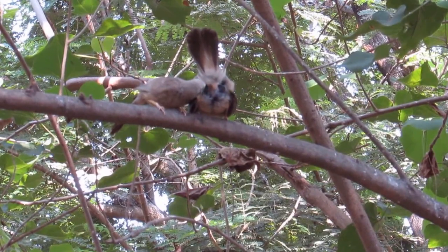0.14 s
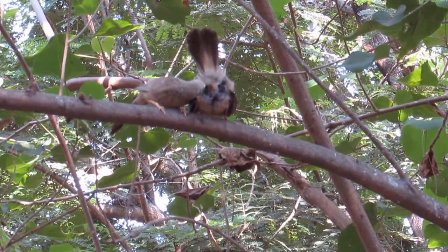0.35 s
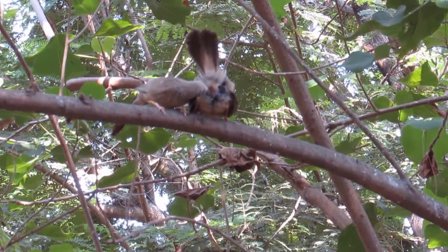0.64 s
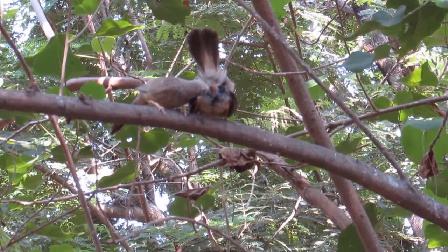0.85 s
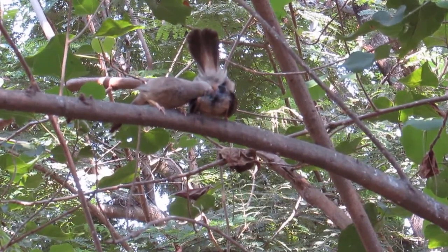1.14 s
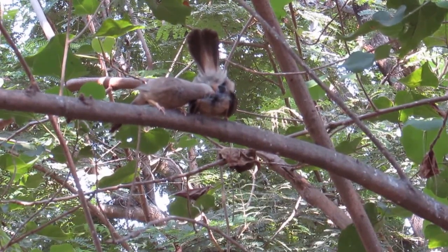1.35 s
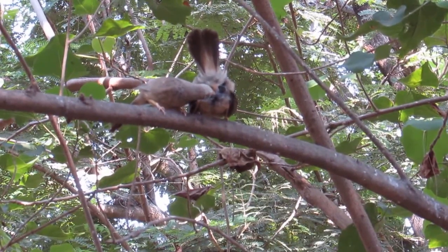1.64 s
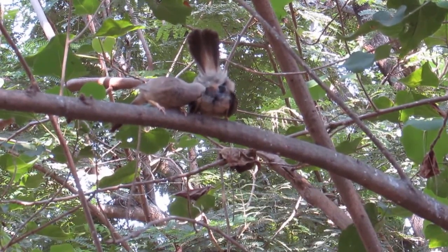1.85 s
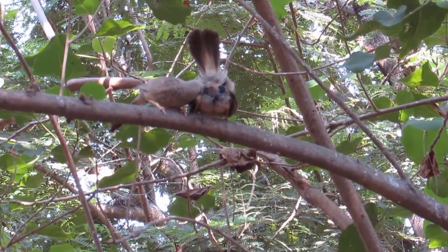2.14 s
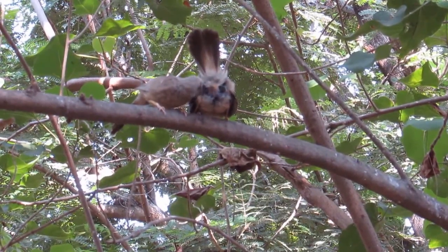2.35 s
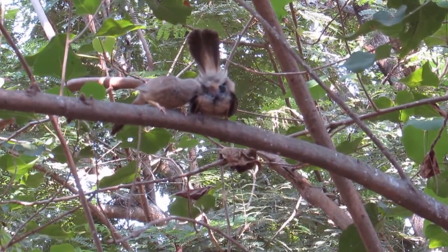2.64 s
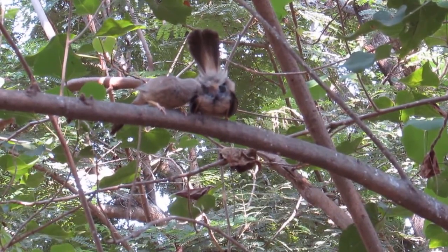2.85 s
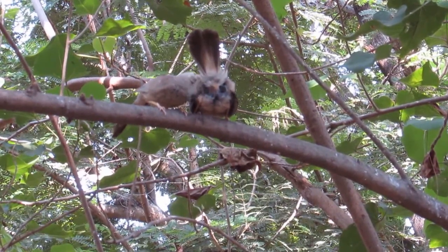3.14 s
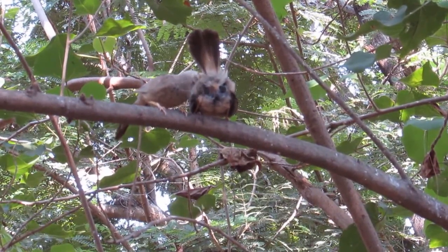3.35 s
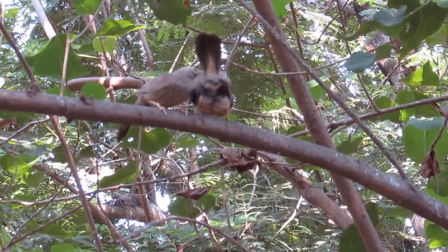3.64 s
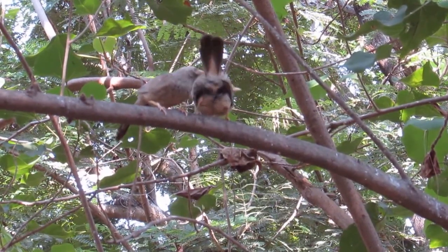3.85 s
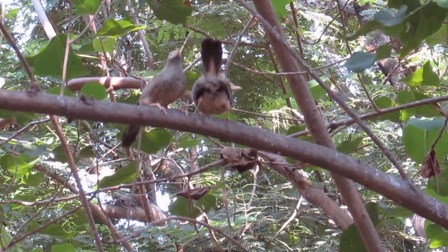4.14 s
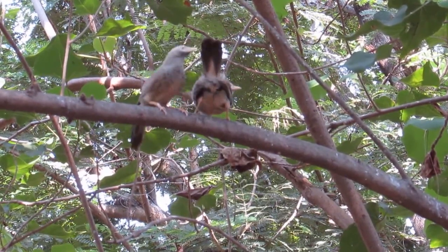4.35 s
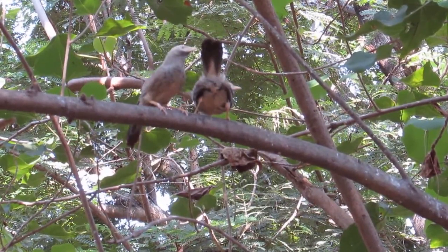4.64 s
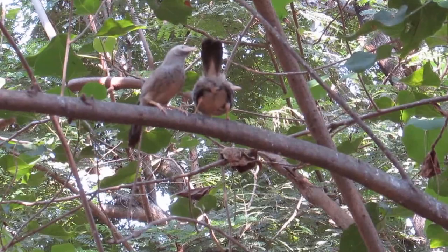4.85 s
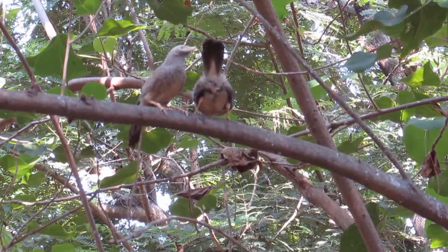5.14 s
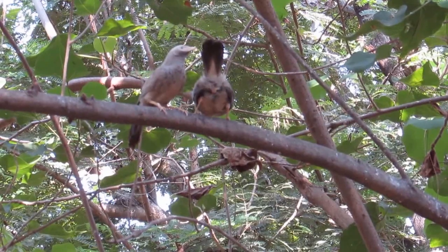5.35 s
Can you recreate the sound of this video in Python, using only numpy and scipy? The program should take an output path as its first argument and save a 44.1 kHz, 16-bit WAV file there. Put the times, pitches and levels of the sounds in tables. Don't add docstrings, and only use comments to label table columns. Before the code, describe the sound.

Outdoors among trees, picked up by a small stereo camera microphone. A bright, steady spray-like hiss lies to one side over soft town rumble, a low vehicle drone and a faint machine hum. Quick far pips around 3 kHz cluster in the first half second, then thin sliding whistles up to 5 kHz. Hoarse, nasal crow caws come at about 1.3, 1.9 and 2.5 s. The hiss dies quickly at 2.4 s, leaving a quieter background, while a soft wavering trill runs from 2.5 to 3 s. Small puffs of hiss follow; at 3.5 s a near bird gives a quick rising flick with a dull rustle. At 4.0 s one sharp, loud close squeak rings off the trunks, with a wing rustle. The distant drone swells near 4.1 s under a long caw to 4.7 s, with twitter and smaller squeaks. A faint caw, a thin nasal squeal, pips and another crow's caw close it at 5.5 s.

```python
import sys
import numpy as np
from scipy import signal
from scipy.fft import rfft, irfft
from scipy.io import wavfile
from scipy.ndimage import uniform_filter1d

SR = 44100
rng = np.random.default_rng(int(sys.argv[2]) if len(sys.argv) > 2 else 0)


def unload_audio(sound):
    columns = np.transpose(np.atleast_2d(sound))
    steps = np.round(np.clip(columns, -1, 1) * 32767)
    wavfile.write(sys.argv[1], SR, steps.astype(np.int16))


def voltage_ratio(level):
    return 10 ** (np.asarray(level, float) / 20)


N = 242991
BINS_HZ = np.arange(N // 2 + 1) * SR / N + 1e-3

# [f/Hz, level/dB per Hz]
HISS_SPECTRUM = [(1180, -44), (2000, -11.5), (2280, -12), (2510, -13), (2980, -8.5), (3230, -8.5),
                 (3770, -5.5), (4010, -7.5), (5490, -2), (9920, 2.5), (10700, 0.5), (11900, -0.5),
                 (14000, -9.5), (16000, -17.5)]
# [f/Hz, phase/rad]
HISS_LEAD = [(20, 0), (4000, .1), (6200, .9), (9000, 1.6), (12000, 2.2), (15200, 3.1)]
# [f/Hz, likeness/0-1]
HISS_LIKENESS = [(2000, .96), (3100, .96), (4500, .82), (9000, .78), (15000, .72)]
# [peak t/s, level/dB, rise/dB per s, fall/dB per s, duller part/dB relative]
PUFFS = [
    (2.78, -61.5, 80, 56, -2),
    (3.27, -62, 85, 43, 0),
    (3.53, -63, 500, 240, 11.5),
    (3.93, -67.5, 61, 60, -7.5),
    (3.99, -56, 300, 300, 6.5),
    (4.08, -63, 45, 52, 2.5),
    (4.68, -66.5, 26.5, 32.5, 0.8058),
    (5.28, -63.5, 81.5, 45.5, 3.5),
]
SPRAY_DB, SPRAY_STOP_S, SPRAY_DIES_DB_PER_S, SPRAY_DULL_DB = -51, 2.4188, 72.5, 2
HISS_FLOOR_DB, HISS_FLOOR_DULL_DB = -85, 9

# [t/s, level/dB]
RUMBLE_LEVEL = [(0, -46), (2.6, -46.5), (5.51, -47)]
# [f/Hz, level/dB per Hz]
RUMBLE_SPECTRUM = [(12, -42), (20, 2), (113, -3.5), (210, -1), (293, -7.5), (377, -8.5), (624, -13.5),
                   (1190, -21.5), (1530, -22), (2460, -33.5), (4180, -36), (5230, -41), (9950, -54),
                   (14700, -46), (16000, -52)]
# [f/Hz, phase/rad]
RUMBLE_LEAD = [(300, 0), (1000, 0.64), (2000, 0), (5000, 0.8905), (15000, 0.42)]
# [f/Hz, likeness/0-1]
RUMBLE_LIKENESS = [(50, .99997), (90, .9993), (170, .99), (290, .91), (640, .7), (1400, .72), (3100, .93),
                   (4500, .9), (6500, .5), (10000, .25)]
# [f/Hz, level/dB per Hz]
DRONE_SPECTRUM = [(120, -27), (170, -1.5), (215, 0), (280, -11), (400, -17.5)]
# [t/s, level/dB]
DRONE_LEVEL = [(0, -43.5), (3.6, -61.5), (3.95, -42.5), (4.12, -36.5), (4.3, -41.5), (4.7, -40.5),
               (5.1, -45.5), (5.45, -42)]
# [f/Hz, level/dB rms]
HUM_LINES = [
    (124.5, -47.5),
    (15734, -77),
]

# [start t/s, length/s, first f/Hz, last f/Hz, top level/dB]
PIPS = [(.015, 0.048, 3040, 2815, -42), (.09, .037, 2840, 2850, -49), (.143, 0.03161, 2790, 2905, -36),
        (.178, 0.02228, 2117, 1970, -38), (.25, .032, 2950, 2750, -47), (.44, 0.028, 2300, 2244, -45),
        (.95, 0.04706, 3120, 2785, -47), (4.07, 0.044, 3900, 3800, -50), (4.305, .06, 4816, 4970, -52),
        (4.74, 0.082, 3730, 3929, -58.5), (5.135, 0.029, 3050, 2790, -45), (5.26, 0.057, 2820, 2818, -41),
        (5.362, 0.02207, 2820, 2750, -50)]
GLIDES = [(.6, .05, 3050, 2867, -48.5), (.655, 0.075, 2905, 3129, -51.5), (.745, 0.045, 3200, 2998, -50),
          (.81, .1, 3096, 2890, -54.5), (.975, .2, 5480, 4750, -49), (1.165, .12, 4780, 3800, -50),
          (1.48, .18, 4950, 4380, -52), (1.93, .27, 4150, 4080, -53), (1.98, .32, 3400, 3600, -53),
          (3.25, .045, 3150, 3210, -50), (3.292, .042, 3200, 4320, -47), (3.345, .13, 4300, 2890, -52),
          (3.33, .14, 4310, 4270, -57), (3.6, .12, 4500, 4150, -60), (3.63, .09, 3800, 3850, -56),
          (3.7, .15, 3800, 2850, -56), (3.85, .3, 3380, 3380, -55), (4.815, 0.03646, 4170, 4930, -51.5),
          (4.855, .075, 4950, 4190, -52), (4.99, 0.15, 4330, 4200, -57.5), (5.28, 0.11, 5399, 5000, -61),
          (5.14, .16, 3450, 3430, -58), (.2, .1, 2027, 2036, -51), (.48, .1, 2310, 2250, -57)]
TRILL = [(2.5, .037, 3120, 2850, -50), (2.545, .07, 2850, 3080, -51), (2.555, .08, 3330, 3380, -56),
         (2.635, .045, 3160, 2900, -50), (2.72, .05, 3080, 2900, -52), (2.735, .05, 3300, 3300, -58),
         (2.79, .045, 3050, 2900, -54), (2.8, .04, 3320, 3300, -58), (2.85, .06, 3150, 2800, -57),
         (2.93, .03, 3100, 3000, -59), (3.0, .016, 2650, 2550, -56), (3.02, .05, 3150, 3300, -62)]
TWITTER = [
    (4.13, .2, 3250, 3450, -53),
    (4.33, .2, 3400, 3400, -54),
]
FLICKS = [
    (3.512, 0.02892, 4350, 7760, -38.5),
    (3.52, .028, 4630, 6702, -48),
    (3.525, 0.02804, 3350, 5240, -45.5),
]
SQUEAKS = [
    (4.59, 0.05789, 4200, 4415, -47.5),
    (4.657, 0.024, 4343, 4177, -42),
    (4.712, .024, 4260, 4034, -43.5),
]
SQUEAL = [
    (5.07, .38, 680, 720, -55.5),
]
# [t/s, f/Hz, level/dB]
LOUD_SQUEAK = [
    [(3.957, 3900, -33), (3.968, 4250, -24), (3.974, 4400, -23), (3.983, 4500, -18), (3.99, 4545, -20),
     (3.996, 4540, -13), (4.003, 4430, -21), (4.014, 3950, -29), (4.026, 3600, -42)],
]
# [multiple, level/dB]
SQUEAK_PARTIALS = [(1, 0), (1.5, -30), (2, -9), (3, -23)]
# [multiple, level/dB]
SQUEAL_PARTIALS = [(4, 1.5), (5, -13), (6, -6), (8, -8), (9, -6), (10, 0.5), (12, -15)]
# [share of length/0-1, share of glide done/0-1, level/dB re top]
PIP_SHAPE = [(0, 0, -1.5), (.35, 0.726, -0.5), (1, 0.7902, -7)]
GLIDE_SHAPE = [(0, 0, -3), (.3, .28, 0), (.7, .68, -2), (1, 1, -7)]
SWELL_SHAPE = [(0, 0, -22), (.35, 0.14, -3), (.6, .65, 0.5), (1, 1, -12)]
FLICK_SHAPE = [(0, 0, -9.5), (.4, .5, -3), (1, 1, 0)]

# [t/s, f/Hz, level/dB]
CAWS = [
    [(1.284, 462, -43), (1.33, 533.9, -35.5), (1.44, 550, -33.5), (1.58, 498.4, -33), (1.672, 468.4, -40),
     (1.7, 472.5, -56)],
    [(1.885, 493.6, -48.5), (1.96, 542, -37), (2.0, 563.5, -34), (2.12, 541.7, -32), (2.268, 505, -34.5),
     (2.31, 499, -62)],
    [(2.485, 529.5, -46), (2.53, 557, -38.5), (2.66, 550, -34), (2.76, 534.7, -37.5), (2.88, 510, -58)],
    [(4.025, 482, -47.5), (4.12, 539.5, -40), (4.24, 545.7, -37), (4.36, 600.3, -32), (4.5, 567.6, -38),
     (4.6, 480.4, -39.5), (4.7, 466, -63)],
    [(4.925, 485.7, -52), (5.06, 517, -39.5), (5.2, 497.1, -51)],
    [(5.3, 509, -39.5), (5.32, 499, -43.5), (5.52, 464, -45)],
]
# [f/Hz, level/dB]
CROW_THROAT = [(600, -46.5), (880, -14.5), (1050, -15), (1250, -1.5), (1550, 6.5), (1750, -4.5),
               (1950, -16.5), (2700, -26.5), (3400, -27), (4300, -30), (6000, -33)]
# [f/Hz, level/dB]
SECOND_CROW_THROAT = [(600, -30), (1000, -6), (1450, 11), (1950, 18.5), (2400, 13), (2900, -32.5),
                      (6000, -49)]
# [share of the call/0-1, low-throat share/dB]
BEAK = [(0, 0.5), (.45, -5.5), (.7, -10.5), (1, -17)]
GAPE_DB = [3, 2, -3, 0.5, -9, -6]
HALF_PITCH_DB, HALF_PITCH_PER_EFFORT = -6.5, -0.106
THROAT_FOLLOWS, THROAT_REST_HZ = .6, 540
EFFORT_BRIGHTENS = 0.49
SHUT_DB_PER_OCTAVE = 38

# [f/Hz, t60/s]
TREES = [(1500, .6), (2900, .55), (5000, .65), (10000, .45)]
# [delay t/s, level/dB]
TRUNK_ECHOES = [(0.019, -27), (0.047, -15), (0.075, -21.5), (.122, -29), (0.169, -32)]


def rms_one(x):
    return x / np.sqrt(np.mean(x ** 2) + 1e-20)


def at_hz(points, hz):
    table_hz, values = np.array(points).T
    return np.interp(np.log(hz), np.log(table_hz), values)


def in_time(rows):
    return voltage_ratio(np.interp(np.arange(N) / SR, *np.transpose(rows)))


def drift(rate_hz, size):
    r = np.exp(-2 * np.pi * rate_hz / SR)
    noise = rng.standard_normal(size + 8000)
    return rms_one(signal.lfilter([1], [1, -2 * r, r * r], noise)[8000:])


def stereo_noise(spectrum, likeness, lead):
    shared, left, right = rfft(rng.standard_normal((3, N)))
    alike = np.clip(at_hz(likeness, BINS_HZ), 0, 1)
    turn = np.exp(.5j * at_hz(lead, BINS_HZ))
    common = np.sqrt(alike) * shared * [turn, 1 / turn]
    separate = np.sqrt(1 - alike) * np.array([left, right])
    return (common + separate) * voltage_ratio(at_hz(spectrum, BINS_HZ))


def scaled_to_band(pair, lo_hz, hi_hz):
    in_band = (BINS_HZ > lo_hz) * (BINS_HZ < hi_hz)
    inside = irfft(pair.mean(axis=0) * in_band, N)
    return irfft(pair, N) / np.std(inside)


def hiss_gains():
    t = np.arange(N) / SR
    spray = voltage_ratio(SPRAY_DB - SPRAY_DIES_DB_PER_S * np.maximum(t - SPRAY_STOP_S, 0)) ** 2
    bright = voltage_ratio(HISS_FLOOR_DB) ** 2 + spray
    dull = voltage_ratio(HISS_FLOOR_DB + HISS_FLOOR_DULL_DB) ** 2 + spray * voltage_ratio(SPRAY_DULL_DB) ** 2
    for peak_s, db, rise, fall, dull_db in PUFFS:
        puff = voltage_ratio(db - np.maximum(rise * (peak_s - t), fall * (t - peak_s))) ** 2
        bright = bright + puff
        dull = dull + puff * voltage_ratio(dull_db) ** 2
    return np.sqrt(bright), np.sqrt(dull)


def hiss():
    bright_gain, dull_gain = hiss_gains()
    pair = stereo_noise(HISS_SPECTRUM, HISS_LIKENESS, HISS_LEAD)
    bright_share = np.clip((BINS_HZ - 6500) / 3000, 0, 1)
    bright = scaled_to_band(pair * bright_share, 9800, 12000)
    dull = scaled_to_band(pair * (1 - bright_share), 5600, 7000)
    return bright * bright_gain + dull * dull_gain


def hum():
    t = np.arange(N) / SR
    total = 0
    for hz, db in HUM_LINES:
        gain = np.sqrt(2) * voltage_ratio(db + 2.8 * drift(2.637, N))
        total = total + gain * np.sin(2 * np.pi * hz * t + drift(2.3, N))
    return total


def town():
    rumble = stereo_noise(RUMBLE_SPECTRUM, RUMBLE_LIKENESS, RUMBLE_LEAD)
    drone = stereo_noise(DRONE_SPECTRUM + [(800, -80)], RUMBLE_LIKENESS, RUMBLE_LEAD)
    rumble = scaled_to_band(rumble, 330, 800) * in_time(RUMBLE_LEVEL)
    drone = scaled_to_band(drone, 40, 800) * in_time(DRONE_LEVEL)
    return rumble + drone + hum()


def shaped(notes, shape):
    return [[(start + share * length, hz0 + glide * (hz1 - hz0), db + down) for share, glide, down in shape]
            for start, length, hz0, hz1, db in notes]


def note_curves(rows):
    s, *columns = np.transpose(rows)
    at = np.arange(round(s[0] * SR), min(round(s[-1] * SR), N))
    to_edge = np.minimum(at - at[0], at[-1] - at + 1)
    fade = np.clip(to_edge / (0.0044 * SR), 0, 1)
    return at, fade, [np.interp(at / SR, s, c) for c in columns]


def songbird(notes, partials, wobble, wobble_hz, flutter_db):
    out = np.zeros(N)
    for rows in notes:
        at, fade, (hz, level_db) = note_curves(rows)
        unsteady_hz = hz * (1 + wobble * drift(wobble_hz, len(at)))
        phase = 2 * np.pi * np.cumsum(unsteady_hz) / SR
        tone = sum(voltage_ratio(db) * np.sin(k * phase) for k, db in partials)
        out[at] += np.sqrt(2) * tone * fade * voltage_ratio(level_db + flutter_db * drift(135, len(at)))
    return out


def far_birds():
    pips = songbird(shaped(PIPS, PIP_SHAPE), [(0.99424, 0)], wobble=0.0049, wobble_hz=40.41, flutter_db=2.5)
    squeal = songbird(shaped(SQUEAL, SWELL_SHAPE), SQUEAL_PARTIALS,
                      wobble=0.0044, wobble_hz=20.898, flutter_db=2.5)
    return pips + squeal


def deep_birds():
    glides = songbird(shaped(GLIDES, GLIDE_SHAPE), [(1, 0)], wobble=.014, wobble_hz=70, flutter_db=2.5)
    trill = songbird(shaped(TRILL, GLIDE_SHAPE), [(1, 0), (1.11, -9)], wobble=.025, wobble_hz=80, flutter_db=4.0)
    twitter = songbird(shaped(TWITTER, GLIDE_SHAPE), [(1, 0)], wobble=.03, wobble_hz=40, flutter_db=6.0)
    return glides + trill + twitter


def crows(jitter=0.0198, rasp_hz=80, quarter_db=-1.5):
    out = np.zeros(N)
    throats = [CROW_THROAT] * (len(CAWS) - 1) + [SECOND_CROW_THROAT]
    multiples = np.r_[np.arange(1.75, 4.3, .25), np.arange(4.5, 10.1, .5)]
    for rows, throat, gape_db in zip(CAWS, throats, GAPE_DB):
        at, fade, (hz, level_db) = note_curves(rows)
        size = len(at)
        climb_octaves = np.log2(hz.max() / np.maximum.accumulate(hz))
        beak_db = np.interp(np.linspace(0, 1, size), *np.transpose(BEAK))
        low_db = beak_db + gape_db + SHUT_DB_PER_OCTAVE * climb_octaves
        half_db = HALF_PITCH_DB + HALF_PITCH_PER_EFFORT * (level_db - level_db.max())
        effort_db = EFFORT_BRIGHTENS * (level_db - level_db.mean())
        stretch = (hz / THROAT_REST_HZ) ** THROAT_FOLLOWS
        hz = hz * (1 + jitter * drift(29.3, size))
        phase = 2 * np.pi * np.cumsum(hz) / SR
        caw = 0
        for k in multiples:
            line_hz = k * hz
            rough = min(.2 * k, .8) * (.8 if k % 1 == 0 else 1)
            blur = 1 + rough * (drift(rasp_hz, size) + 1j * drift(rasp_hz, size))
            closed_beak = np.clip((1420 - line_hz) / 250, 0, 1)
            weak_db = half_db * (k % 1 > 0) + quarter_db * (k % .5 > 0)
            bright_db = np.clip(np.log2(line_hz / 1900), 0, 1) * effort_db
            throat_db = at_hz(throat, line_hz / stretch)
            line_db = throat_db + weak_db + bright_db + closed_beak * (low_db + 13)
            caw = caw + voltage_ratio(line_db) * np.real(blur * np.exp(1j * k * phase))
        loudness = np.sqrt(uniform_filter1d(caw ** 2, 2600) + 1e-12)
        out[at] += caw / loudness * fade * voltage_ratio(level_db)
    return out


def near_birds():
    flicks = songbird(shaped(FLICKS, FLICK_SHAPE), [(1, 3), (2, -14)], wobble=0.029, wobble_hz=300, flutter_db=-1.0)
    squeaks = songbird(LOUD_SQUEAK + shaped(SQUEAKS, PIP_SHAPE), SQUEAK_PARTIALS,
                       wobble=.008, wobble_hz=150, flutter_db=1.5)
    return flicks + squeaks


def off_trunks(x):
    return x + sum(voltage_ratio(db) * np.roll(x, round(s * SR)) for s, db in TRUNK_ECHOES)


def among_trees(x, dry_db, wet_db, early_db, pan_db=0., lead_count=0, likeness=.9):
    t = np.arange(SR) / SR
    onset = np.clip(t / .003, 0, 1)
    white = rng.standard_normal((3, SR)) * voltage_ratio(1.5 * drift(40, SR)) * onset
    echoes = 0
    edges_hz = [300, 2200, 3600, 7000, 17000]
    for (_, t60), lo, hi in zip(TREES, edges_hz, edges_hz[1:]):
        band = signal.sosfilt(signal.butter(2, [lo, hi], "band", fs=SR, output="sos"), white)
        tail = voltage_ratio(-60 * t / t60)
        leaves = voltage_ratio(early_db - 60 * t / 0.14)
        echoes = echoes + band * (tail + leaves)
    alike = np.clip(likeness, 0, 1)
    echoes = np.sqrt(alike) * echoes[0] + np.sqrt(1 - alike) * echoes[1:]
    echoes = echoes / np.sqrt(np.sum(echoes ** 2) / 2)
    wet = signal.fftconvolve(x[None], echoes, axes=1)[:, :N]
    left, right = voltage_ratio(dry_db) * x + voltage_ratio(wet_db) * wet
    right = np.roll(right, lead_count)
    return np.array([left * voltage_ratio(pan_db / 2), right * voltage_ratio(-pan_db / 2)])


def scene():
    birds = among_trees(far_birds(), dry_db=-2.5, wet_db=-6., early_db=3., likeness=.95)
    birds += among_trees(deep_birds(), dry_db=-9., wet_db=.5, early_db=1., likeness=.95)
    birds += among_trees(crows(), dry_db=-2.0, wet_db=-4.5, early_db=-4.5, pan_db=1.5, lead_count=1, likeness=0.64)
    birds += among_trees(off_trunks(near_birds()), dry_db=-3.5, wet_db=-9., early_db=8., pan_db=-1.2, likeness=.94)
    return birds + hiss() + town()


def top_cut(x):
    return signal.sosfilt(signal.butter(12, 15830, fs=SR, output="sos"), x)


def record(dry):
    low_cut = signal.butter(4, 49.5, "high", fs=SR, output="sos")
    return top_cut(signal.sosfilt(low_cut, dry))


dry = scene()
out = record(dry)
unload_audio(out)
```